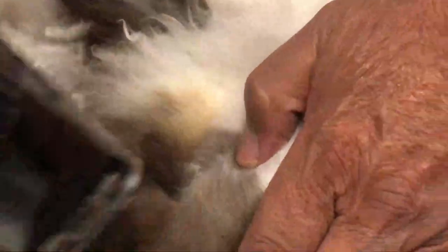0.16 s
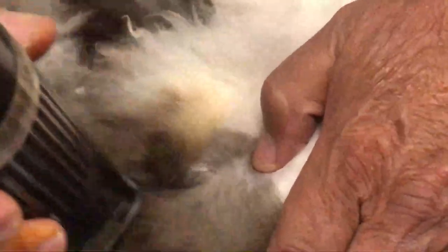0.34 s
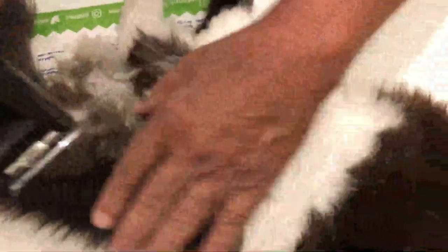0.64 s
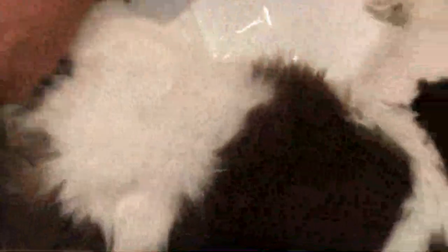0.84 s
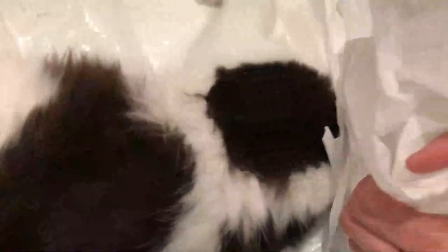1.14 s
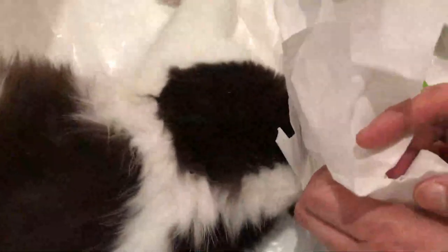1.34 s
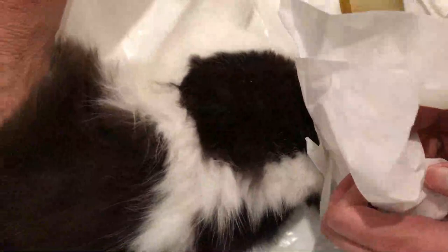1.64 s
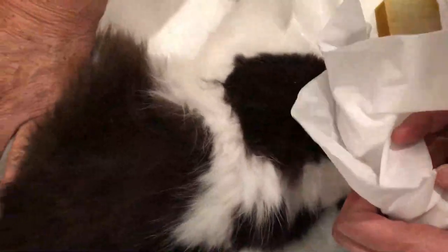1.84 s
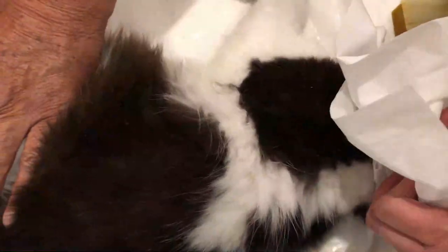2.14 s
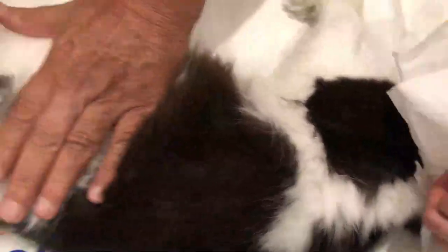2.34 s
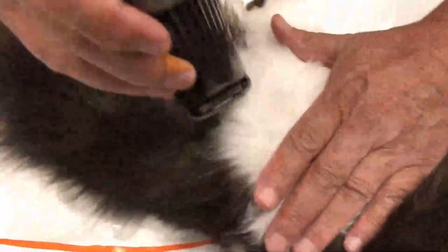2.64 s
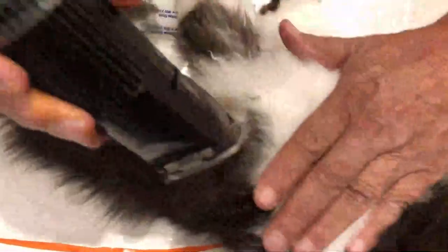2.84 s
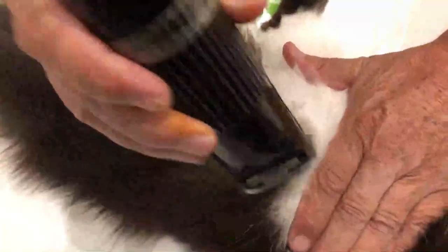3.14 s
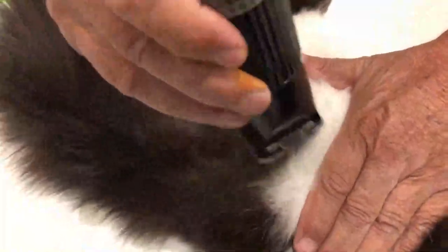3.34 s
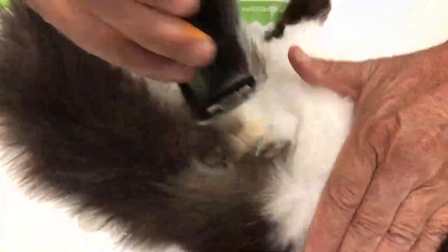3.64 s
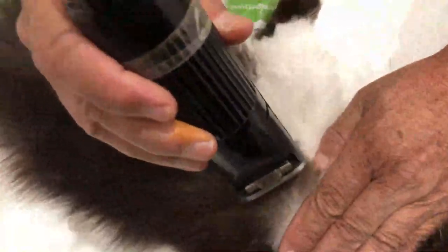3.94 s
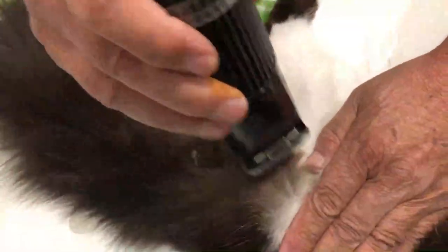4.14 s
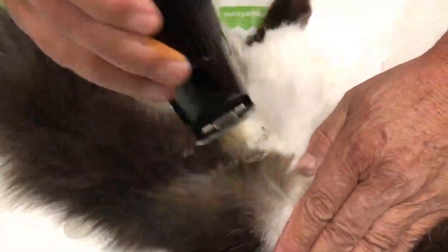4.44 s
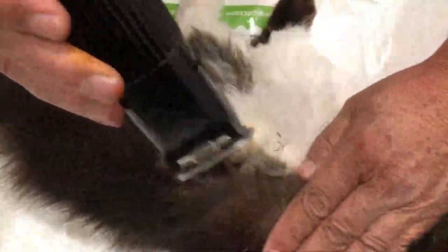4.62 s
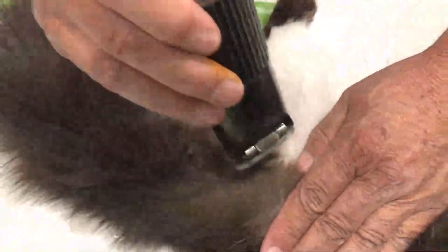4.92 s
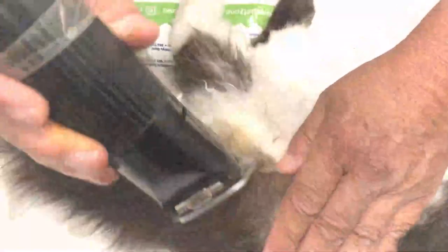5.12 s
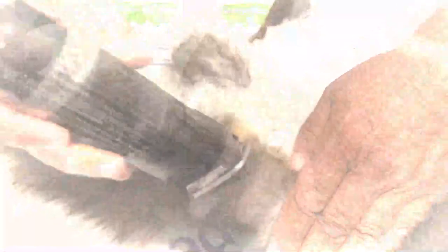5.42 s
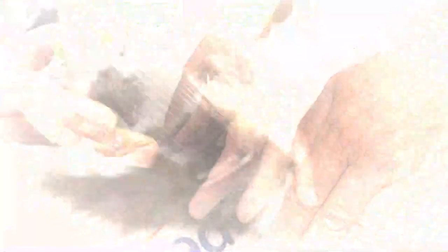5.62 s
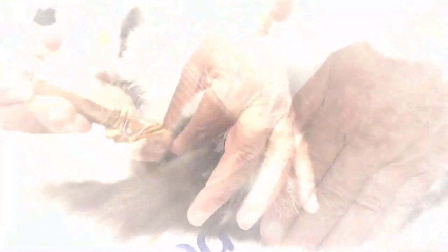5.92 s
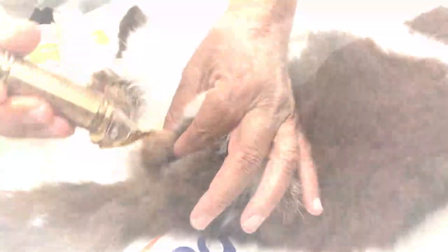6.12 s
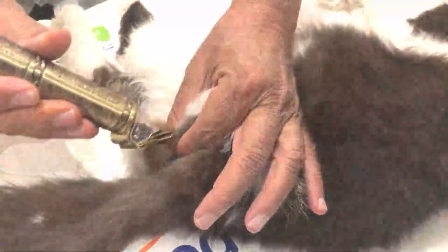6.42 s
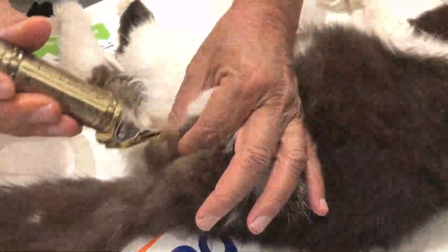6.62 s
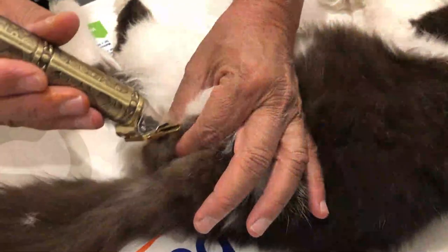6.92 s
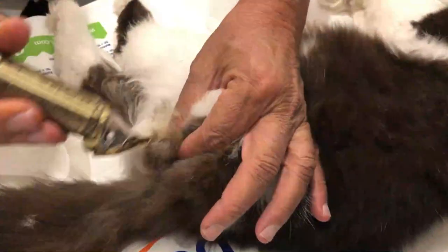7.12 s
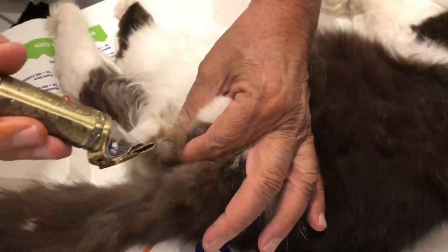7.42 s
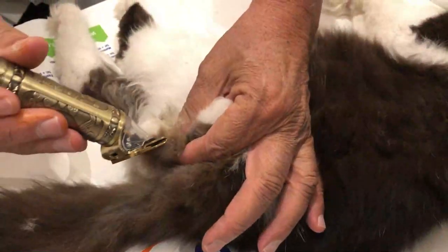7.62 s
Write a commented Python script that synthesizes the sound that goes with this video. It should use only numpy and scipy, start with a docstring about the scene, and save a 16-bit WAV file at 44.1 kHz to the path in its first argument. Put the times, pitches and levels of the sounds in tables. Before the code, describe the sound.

Close indoors, a rattling clipper motor surges and crackles on fur for nearly six seconds, followed by a smoother trimmer buzzing over low room hum.

```python
"""In a room, close to the microphone, rotary clippers shave a cat: the motor whirs on orders of its shaft,
random impacts rattle through the housing's resonances, and the steel blade rasps in surges and bites into
the fur, with spells of about nine beats a second. After a very short silence a small trimmer buzzes evenly,
a train of strokes with five knocks each built from harmonics, over the low hum of the room."""
import sys
import numpy as np
from scipy import signal
from scipy.fft import rfft, irfft
from scipy.io import wavfile
from scipy.ndimage import uniform_filter1d, map_coordinates

SR = 44100
rng = np.random.default_rng(int(sys.argv[2]) if len(sys.argv) > 2 else 0)


def unload_audio(sound):
    """Save the sound as a 16-bit wav file, at the path given as the first command line argument."""
    columns = np.transpose(np.atleast_2d(sound))
    # keep every value between -1 and 1, then stretch to whole-number steps
    steps = np.round(np.clip(columns, -1, 1) * 32767)
    wavfile.write(sys.argv[1], SR, steps.astype(np.int16))


N = 342657
T = np.arange(N) / SR  # seconds
CLIPPER_END, TRIMMER_START = 5.777, 5.825  # seconds

# How far the clippers are off the fur. Each row: time in seconds, lift (0 = blade on the fur, 1 = lifted away).
LIFT = [(0, 0.17), (.66, 0.014), (.9, 0.67), (1.4, 0.55), (2.3, 0.9), (2.62, 0.047), (5.77, 0.062)]
# Resonances of the steel blade. Each row: centre in Hz, width in Hz, boost in dB.
BLADE_RESONANCES = [(3600, 430, 1.1), (5510, 600, 6.4), (8700, 550, 7), (11990, 620, 6), (14400, 570, 2.6)]
# Knocks within one trimmer stroke. Each row: position as a share of the stroke, relative level in dB,
# centre in Hz, width in octaves, decay in seconds, share of bare click.
STROKE_KNOCKS = [(.46, 0, 4500, 1.25, .0012, .55), (.54, -4, 4200, .7, .0007, .2),
                 (.01, -1.5, 3500, .7, .001, .4), (.14, -4, 9500, .3, .0004, .5),
                 (.69, -1.5, 12500, .14, .0006, .2)]
# Swells of the trimmer's body, blade ring and treble. Each row: held level in dB, rise in dB,
# rise time in seconds.
TRIMMER_SWELLS = [(-38, 6, 0.85), (-34.5, 5, 0.83), (-35.5, 6, 0.73)]


def amp(db):
    """Decibels to gain."""
    return 10 ** (np.asarray(db) / 20)


def unit(x):
    """Scales to rms 1."""
    return x / np.sqrt(np.mean(abs(x) ** 2) + 1e-20)


def band_unit(x, band):
    """Scales so that one band (Hz, Hz) has rms 1."""
    band_pass = signal.butter(4, band, "band", fs=SR, output="sos")
    return x / np.std(signal.sosfilt(band_pass, x))


def follow(rows):
    """Draws each column of a breakpoint curve sample by sample."""
    seconds, *columns = np.transpose(rows)
    return [np.interp(T, seconds, column) for column in columns]


def drift(rate):
    """Smooth random curve of rms 1, with this many random points a second."""
    points = rng.standard_normal(N // 16)
    return unit(map_coordinates(points, [T * rate], order=2, mode="wrap"))


def shape(slope, resonances=()):
    """A dB response over frequency: a slope with bell-shaped resonances added."""
    slope_hz, slope_db = np.transpose(slope)

    def response(hz):
        base = np.interp(np.log(hz + 1), np.log(slope_hz + 1), slope_db)
        bells = sum(db * np.exp(-((hz - centre) / width) ** 2) for centre, width, db in resonances)
        return base + bells
    return response


def colour(x, response, size=4096):
    """Minimum-phase filter with a given dB response: clicks ring after they land."""
    log_gain = np.log(amp(response(abs(np.fft.fftfreq(size, 1 / SR)))))
    taps = np.fft.ifft(np.exp(np.conj(signal.hilbert(log_gain)))).real
    return signal.oaconvolve(x, taps)[:N]


def resonate(x, hz, width_hz):
    """A resonance that follows a frequency curve: two equal poles in a frame turning at that frequency."""
    turn = np.exp(2j * np.pi * np.cumsum(hz) / SR)
    r = np.exp(-np.pi * width_hz / SR)
    return (turn * signal.lfilter([(1 - r) ** 2], [1, -2 * r, r * r], x / turn)).real


def impacts(strength, per_s, spread_db):
    """Tiny impacts at random moments, of uneven size and either sign, weighted by a strength curve."""
    size = amp(spread_db * np.minimum(rng.exponential(1, N), 4)) * rng.choice([-1, 1], N)
    return unit(strength * size * (rng.random(N) < per_s / SR))


def decaying(kicks, decay_s):
    """Exponential decay after each kick."""
    return signal.lfilter([1], [1, -np.exp(-1 / (SR * decay_s))], kicks)


def swell(held_db, rise_db, rise_s):
    """Gain that climbs from the trimmer's start and then holds."""
    return amp(held_db - rise_db * np.clip(1 - (T - TRIMMER_START) / rise_s, 0, 1))


def room():
    """Low hum and rumble of an appliance: sines that waver in level and phase over filtered noise."""
    # Hum lines. Each row: frequency in Hz, relative level in dB.
    hum_lines = [(49, -48.5), (78.3, -55), (99, -55), (128.4, -39.5)]
    # Spectrum of the rumble. Each row: frequency in Hz, relative level in dB.
    rumble_slope = [(15, -32), (35, -13), (75, 2.5), (150, -3.5), (215, -2), (250, -9), (400, -18),
                    (900, -20.5), (1500, -26.5), (3000, -28), (6000, -29), (9000, -36), (16000, -42)]
    hum = 0
    for hz, db in hum_lines:
        level = amp(db + drift(5))
        hum = hum + level * np.sqrt(2) * np.sin(2 * np.pi * hz * T + 0.24 * drift(4.5))
    rumble = amp(-39.0) * unit(colour(rng.standard_normal(N), shape(rumble_slope)))
    return swell(held_db=-37.5, rise_db=4.5, rise_s=0.65) * unit(hum + rumble)


def handling():
    """Hands on the table: softly swelling low noise and dull bumps, sines with a bell-shaped level."""
    # Spectrum of the low noise under the clippers. Each row: frequency in Hz, relative level in dB.
    floor_slope = [(15, -26), (45, -5), (80, -3), (120, 5), (170, -2), (260, -6), (600, -21), (16000, -40)]
    # Soft bumps. Each row: middle in seconds, half-length in seconds, pitch in Hz, relative peak in dB.
    soft_bumps = [(.02, .025, 115, -40), (.13, .02, 130, -44), (1.075, .02, 120, -41),
                  (1.11, .02, 170, -41), (1.77, .012, 80, -37), (1.785, .012, 165, -37),
                  (2.07, .02, 115, -44), (2.45, .035, 112, -43), (3.25, .015, 130, -41),
                  (3.96, .02, 125, -41), (4.25, .02, 115, -43), (4.36, .02, 115, -43),
                  (4.94, .02, 105, -45)]
    floor = amp(-49.5 + 1.4 * drift(6.1)) * unit(colour(rng.standard_normal(N), shape(floor_slope)))
    phase = .7 * drift(90)  # roughens the bumps
    thuds = 0
    for s, length, hz, db in soft_bumps:
        envelope = np.exp(-((T - s) / length) ** 2)
        thuds = thuds + amp(db) * envelope * np.sin(2 * np.pi * hz * (T - s) + phase)
    return floor + amp(1.5) * thuds


def teeth_hiss(turns):
    """A faint fizz of the sliding teeth: filtered impacts, strongest after the stroke's first listed knock."""
    sliding = .5 + np.exp(-((turns - STROKE_KNOCKS[0][0]) % 1) / 0.16)
    response = shape([(500, -12), (2950, -14), (3500, 8), (4300, -7), (4750, -7), (5200, 2), (5650, -6),
                      (6250, 1), (6650, -9), (7300, -4), (8600, -16), (10500, -16), (12500, -6), (15000, -5)])
    fizz = unit(colour(impacts(sliding, per_s=6000, spread_db=3), response))
    return amp(-15.) * swell(*TRIMMER_SWELLS[2]) * fizz


def wandering(z, hz):
    """Smooths random values over the hand's path: short waves change sooner than long ones."""
    wander_cycles = 2600  # sets how long a partial keeps its strength
    per_s = np.fft.fftfreq(len(z), (T[-1] - TRIMMER_START) / len(z))[:, None]
    smoothing = np.exp(-(per_s * wander_cycles / hz) ** 2 / 2)
    z = np.fft.ifft(np.fft.fft(z, axis=0) * smoothing, axis=0)
    return z / np.sqrt(np.mean(abs(z) ** 2, 0))


def stroke_partials(hz, count=205, size=512):
    """Partials of successive strokes: each knock is a click, a short ring and an echo, landing unevenly."""
    spread_db, slip_s = .6, .000007  # rms spread of the knocks' force and timing
    hand_change, echo = .8, .115     # how far the moving hand changes the ring; constant tail of the ring
    k = np.arange(1, len(hz) + 1)
    change = hand_change * np.minimum(hz / 7000, 1.2) ** 1.5  # short waves feel the moving hand most
    grit = .16 * np.minimum(hz / 4000, 1) ** 2                # fresh noise in each ring
    out = 0
    for at, db, centre_hz, octaves, decay_s, click_share in STROKE_KNOCKS:
        age = (np.arange(size) / size - at) % 1 / hz[0]  # seconds since the knock
        noise = rng.standard_normal((count + 1, size)) * (np.exp(-age / decay_s) + echo)
        rings = unit(rfft(noise)[:, k])
        ring = (rings[0] + change * wandering(rings[1:], hz)) / np.sqrt(1 + change ** 2)
        ring = ring + grit * rings[:0:-1]
        click = np.exp(-2j * np.pi * k * at)
        force, delay = unit(uniform_filter1d(rng.standard_normal((2, count, 1)), size=7, axis=1))
        landing = amp(db + spread_db * force) * np.exp(-2j * np.pi * hz * slip_s * delay)
        band = np.exp(-(np.log2(hz / centre_hz) / octaves) ** 2 / 2)
        out = out + landing * band * (ring + click_share * click)
    return out / np.sqrt(np.mean(abs(out) ** 2, 0))


def trimmer(count=150):
    """An even train of strokes: a wavetable of partials whose colour drifts as the hand moves."""
    # Pace of the trimmer. Each row: time in seconds, strokes per second.
    stroke_rate = [(5.84, 105.7), (6.217, 105.9), (6.428, 105.4), (6.668, 105.8), (6.908, 105.4),
                   (7.134, 105.7), (7.76, 105.5)]
    # Low partials. Each row: multiple of the stroke rate, relative level in dB.
    low_partials = [(1, -24), (2, 1), (3, -31), (4, -35), (5, -6.5), (6, -9.5), (7, 4), (8, -3), (9, 10.5),
                    (10, -3.5), (11, 11.5), (12, -28), (13, -4.5), (14, 0.5), (15, -2.5), (16, -4),
                    (17, -3), (18, -3.5), (19, 4.5), (20, 0.5), (21, -18), (22, -1), (23, 8.5), (24, 5),
                    (25, 5), (26, -3.5), (27, -30), (28, -21.5), (29, -14), (30, -4.5), (31, -22), (32, -1),
                    (33, -6.5), (34, -1), (35, -3), (36, -9), (37, -6), (38, -16), (39, -10.5), (40, -17)]
    # Outline of the high partials. Each row: frequency in Hz, relative level in dB.
    sheen = [(4330, -13), (4435, -22), (4540, -8), (4650, -13), (5070, -11), (5280, -7.5), (5490, -12),
             (5650, -21), (5915, -9), (6130, -13), (6440, -8.5), (6560, -18), (6980, -19), (7180, -12),
             (7500, -17), (8500, -20), (9500, -26), (11000, -26), (11500, -21), (12300, -18), (12700, -24),
             (13200, -21), (14300, -25), (15500, -21)]
    # The blade ring sinks and grows as it is pressed into the fur. Each row: time in seconds, centre in Hz,
    # boost in dB.
    pressed_ring = [(5.83, 3500, 0), (6.07, 3400, .5), (6.19, 3400, 7), (6.3, 3570, 4), (6.55, 3600, 4),
                    (7.05, 3550, 3), (7.2, 3370, 8), (7.33, 3520, 7), (7.5, 3450, 5), (7.76, 3480, 4.5)]
    hz = np.arange(1, count + 1) * np.mean(np.array(stroke_rate)[:, 1])
    partial_db = shape(sheen)(hz)
    for multiple, db in low_partials:
        partial_db[round(multiple) - 1] = db
    stroke = stroke_partials(hz)
    moments = np.linspace(TRIMMER_START, T[-1], len(stroke))[:, None]
    ring_hz, ring_db = (np.interp(moments, T, curve) for curve in follow(pressed_ring))
    ring = amp(ring_db * np.exp(-((hz - ring_hz) / 220) ** 2))
    partials = amp(partial_db) * stroke * ring / np.sqrt(np.mean(ring ** 2, 0))

    on = T >= TRIMMER_START
    turns = np.cumsum(follow(stroke_rate)[0]) / SR + 0.00025 * drift(90)  # slight jitter
    position = np.linspace(0, len(partials) - 1, on.sum())
    part = np.searchsorted([2900, 4300], hz)  # body, blade ring, treble (edges in Hz)
    out = np.zeros(N)
    for i, band in enumerate(TRIMMER_SWELLS):
        cycles = irfft(np.pad(partials * (part == i), ((0, 0), (1, 0))), 4096)  # one waveform a row
        place = [position, turns[on] % 1 * cycles.shape[1]]
        wave = map_coordinates(cycles, place, order=1, mode="grid-wrap")
        out[on] += swell(*band)[on] * unit(wave)
    return out + teeth_hiss(turns)


def driven(level_db, by_effort, by_surge, lifted_db):
    """Gain of one part of the clippers: it follows the effort, the surges and the lift off the fur."""
    # How loud the clippers run as the hand moves them about. Each row: time in seconds, change in dB
    # (each part scales it).
    effort = [(0, -2.5), (.85, -2), (1.45, -6), (1.75, -3), (2.3, -3), (2.85, 0), (4, 0), (4.7, 0.5),
              (5.3, -1.16), (5.77, -7)]
    # Surges in which the steel rubs harder. Each row: middle in seconds, half-length in seconds,
    # rise in dB (each part scales it).
    surges = [(.27, 0.13, 2), (0.553, 0.057, 3.5), (0.73, 0.12, 5), (.87, 0.097, 0.5), (2.859, 0.17, 2.5),
              (3.809, 0.25, 5), (4.656, 0.19, 1), (5.162, 0.22, 5), (5.626, 0.37, 4.5)]
    surge_db = 0
    for s, length, db in surges:
        surge_db = surge_db + db * np.cos(np.pi / 2 * np.clip((T - s) / length, -1, 1)) ** 4
    lift_db = lifted_db * follow(LIFT)[0]
    return amp(level_db + by_effort * follow(effort)[0] + by_surge * surge_db + lift_db)


def motor(turns):
    """Wavering orders of the shaft: the first wobbles in the hand, the second sings as fur loads the blade."""
    # Level of the first order. Each row: time in seconds, rms level in dB.
    shaft_hum = [(0, -63), (.15, -62), (.27, -49), (.37, -60), (.55, -51), (.74, -49), (.88, -56),
                 (1.25, -61), (1.42, -49), (1.65, -57.5), (1.86, -48), (2.1, -54.5), (2.2, -49.5),
                 (3.2, -52), (3.8, -44.5), (4.1, -50.5), (5.2, -46), (5.4, -56.5), (5.77, -52)]
    # Higher orders. Each row: multiple of the shaft speed, rms level on the fur in dB, dB more when lifted.
    higher_orders = [(3, -55, 0), (4, -59, 0), (9, -55.5, 6)]
    second = driven(level_db=-41.0, by_effort=1.5, by_surge=0.29, lifted_db=-19.0)
    orders = [(2, second)]
    for multiple, db, lifted_db in higher_orders:
        orders.append((multiple, amp(db + lifted_db * follow(LIFT)[0])))
    hum_level = amp(follow(shaft_hum)[0] + 1.2 * drift(22))
    hum = hum_level * np.sin(2 * np.pi * turns + .45 * drift(25))
    whine = 0
    for multiple, gain in orders:
        whine = whine + gain * amp(1.1 * drift(14)) * np.sin(2 * np.pi * (multiple * turns + rng.random()))
    return np.sqrt(2) * (hum + whine)


def chatter(turns, gear, scatter, decay_s, steady):
    """Strength of the blade's knocks: a blow at each uneven reversal that dies away, limited by its play."""
    reversals = np.diff(np.floor(turns / gear + scatter * drift(45)), prepend=0) > 0
    blows = decaying(reversals * rng.rayleigh(1, N), decay_s)
    return steady + 2 * np.tanh(blows / 2)


def rattle(knocking, lift):
    """The knocks sound through the housing, whose resonances change when it leaves the fur."""
    # Overall slope of the housing. Each row: frequency in Hz, response in dB.
    housing_slope = [(60, -12.5), (250, -11), (480, -7), (650, 0), (1150, 0.5), (2400, 1), (4500, -1.5),
                     (8000, -8.5), (10000, -11), (16000, -22.5)]
    # Housing resonances. Each row: centre in Hz, width in Hz, boost on the fur in dB, boost lifted in dB.
    housing = [(692, 34, 4, -11), (823, 133, 3, 8.5), (934, 55, 5.5, 1.5), (1343, 39, 5, -3),
               (1630, 100, 2.5, -1), (1800, 274, 3.5, 4.5), (2370, 130, -4.5, 2), (3073, 49, 6, -9),
               (3700, 340, 0, -2), (4500, 160, 2, -20), (5180, 230, 3, 7.5), (6940, 860, 4, 2),
               (8660, 250, -4, -11)]
    # The strongest resonance shifts with the grip. Each row: time in seconds, centre in Hz.
    grip = [(0, 1480), (.6, 1460), (.87, 1550), (1.1, 1594), (2.7, 1510), (3, 1550), (3.5, 1460),
            (4.7, 1495), (5.2, 1500), (5.77, 1530)]
    hits = impacts(knocking + 0.45, per_s=14000, spread_db=1.85)
    fur_resonances = [(hz, width, fur_db) for hz, width, fur_db, _ in housing]
    lifted_resonances = [(hz, width, lifted_db) for hz, width, _, lifted_db in housing]
    on_fur = colour(hits, shape(housing_slope, fur_resonances))
    lifted = colour(hits, shape(housing_slope, lifted_resonances))
    body = band_unit((1 - lift) * on_fur + lift * lifted, (600, 2400))
    honk_hits = impacts(knocking + 0.43, per_s=14000, spread_db=3.5)
    honk = unit(resonate(honk_hits, follow(grip)[0], width_hz=250))
    body_gain = driven(level_db=-32.5, by_effort=0.84, by_surge=0.19, lifted_db=0.2)
    honk_gain = driven(level_db=-36.5, by_effort=1.2, by_surge=.05, lifted_db=-7.0)
    return body_gain * body + honk_gain * honk


def slackening(ease_s, snap_s):
    """Beat after beat the blades ease apart and snap back into contact: dB of the rasp and of the ring."""
    # Spells of beating. Each row: first snap in seconds, last snap in seconds, drop of the rasp in dB,
    # drop of the ring in dB.
    spells = [(.125, .125, -6, -1), (.21, .21, -7, -14), (.385, .495, -8, -4), (.675, .675, -6, -3),
              (1.782, 2.33, -8, -1.5), (2.505, 2.83, -8, -3.5), (3.085, 3.085, -3, -3),
              (3.19, 3.615, -9, -4), (4.086, 4.497, -8, -5), (4.864, 5.064, -4, -3),
              (5.38, 5.715, -5.5, -2.5)]
    beat_s, slack_s = .108, 0.063  # approximate time from snap to snap; slack time before each snap
    db = np.zeros((2, N))
    for first, last, *drops in spells:
        for snap in np.linspace(first, last, round((last - first) / beat_s) + 1):
            slack = np.clip((T - snap + slack_s) / ease_s, 0, 1) * (T < snap)
            db += np.outer(drops, slack)
    pole = np.exp(-1 / (SR * snap_s))
    return signal.lfilter([1 - pole], [1, -pole], db)


def blade(knocking, lift):
    """Steel rubs on steel; its main ring sits higher when the fur does not load it."""
    # Overall slope of the steel. Each row: frequency in Hz, response in dB.
    blade_slope = [(200, -32), (700, -5.5), (2000, 1), (4500, -2), (7000, -0.5), (10300, -1), (13000, 0),
                   (16000, 2)]
    # Level of the main ring before the beats. Each row: time in seconds, rms level in dB.
    ring_level = [(0, -38), (.65, -43), (.75, -36.5), (1, -37.5), (1.45, -43), (1.8, -37), (2.95, -41),
                  (3.3, -40), (3.7, -37), (3.9, -30.5), (4.15, -37.5), (4.6, -36.5), (5.25, -37),
                  (5.77, -53)]
    rasp_db, ring_db = slackening(ease_s=0.03, snap_s=0.00058)
    rubbing = impacts(knocking + .5, per_s=9000, spread_db=0.0)
    steel = band_unit(colour(rubbing, shape(blade_slope, BLADE_RESONANCES)), (10000, 15800))
    ring_hits = impacts(knocking, per_s=12000, spread_db=1.5)
    ring = unit(resonate(ring_hits, 3470 + 230 * lift + 70 * drift(7), width_hz=640))
    rasp_gain = driven(level_db=-33.5, by_effort=1.6, by_surge=1.0, lifted_db=-1.5)
    return rasp_gain * amp(rasp_db) * steel + amp(follow(ring_level)[0] + ring_db) * ring


def singing(knocking, sharpness):
    """The knocks briefly excite one narrow resonance of housing or steel, which swells and fades."""
    # Sung notes. Each row: middle in seconds, half-length in seconds, pitch in Hz,
    # level in dB (rms before the swell).
    notes = [(.28, .2, 2250, -42), (.28, .15, 3250, -41), (.55, .15, 1950, -41), (.76, .1, 2060, -42),
             (.8, .15, 5500, -42), (.85, .2, 2400, -43), (.87, .15, 1620, -37), (.92, .12, 708, -48),
             (1.22, .15, 1535, -42), (1.55, .2, 1620, -45), (2.0, .35, 3720, -42), (2.05, .35, 8700, -46),
             (2.38, .12, 1470, -39), (2.95, .2, 1530, -37), (3.85, .12, 1960, -39), (4.7, .12, 1505, -34),
             (5.24, .14, 1880, -35), (5.24, .12, 14350, -35)]
    out = np.zeros(N)
    for s, length, hz, db in notes:
        near = abs(T - s) < length
        noise = knocking[near] * rng.standard_normal(near.sum())
        ring = resonate(noise, np.full(near.sum(), hz), hz / sharpness)
        out[near] += amp(db) * unit(ring) * np.cos(np.pi / 2 * (T[near] - s) / length) ** 2
    return out


def choked(x):
    """Fur packed against the blade damps the band in which it rings."""
    # Spells of thick fur. Each row: start in seconds, end in seconds, change of the ringing band in dB.
    thick_fur = [(.14, .212, -4), (.36, .495, -3), (.63, .674, -3), (2.69, 2.727, -3), (3.47, 3.51, -4),
                 (3.883, 3.891, -6)]
    db = sum(change * ((T > start) & (T < end)) for start, end, change in thick_fur)
    band_pass = signal.butter(2, (2200, 4900), "band", fs=SR, output="sos")
    ringing = signal.sosfiltfilt(band_pass, x)
    return x + (amp(uniform_filter1d(db * 1., size=300)) - 1) * ringing


def bites(knocking, rise_s, gain_db):
    """The teeth bite into a tuft: a quick burst of snapping hairs, as impacts, that rings the blade."""
    # Bites. Each row: start in seconds, relative level in dB.
    tufts = np.array([(.215, -33), (.30, -33), (.505, -33), (2.63, -31), (2.73, -28), (2.86, -32),
                      (3.085, -25.5), (3.205, -31), (3.305, -25), (3.41, -28), (3.51, -29), (3.615, -29.5),
                      (3.845, -28), (4.085, -27), (4.19, -27.5), (4.305, -29), (4.41, -31), (5.065, -29)])
    age = np.maximum(T - tufts[:, :1], 0) / rise_s
    strength = amp(tufts[:, 1]) @ (age * np.exp(1 - age))
    response = shape([(500, -19), (2850, -21), (3080, -2.0), (3550, -2.5), (3800, -6), (4200, -25),
                      (15000, -13.5)])
    snapping = impacts(knocking, per_s=9000, spread_db=1.0)
    return amp(gain_db) * strength * unit(colour(snapping, response))


def bursts(rows, decay_s):
    """Noise that jumps up and dies away at each event."""
    kicks = np.zeros(N)
    for s, db in rows:
        kicks[round(s * SR)] = amp(db)
    return decaying(kicks, decay_s) * rng.standard_normal(N)


def clacks(decay_s, gain_db):
    """The blade snags and strikes its guide: a crack and a short ring, both decaying noise."""
    # Hard clacks. Each row: start in seconds, relative level in dB.
    strikes = [(.055, -17), (.103, -18), (0.1311, -8.5), (.151, -18), (0.1735, -11), (.191, -18),
               (0.2563, -14.5), (0.386, -14), (.405, -19), (0.4374, -14), (.447, -18), (0.462, -14),
               (0.5082, -14), (0.5327, -10), (.612, -16), (.647, -17), (0.6774, -9), (0.6948, -10.5),
               (0.8415, -14), (0.8674, -12), (0.9268, -14), (1.0525, -20), (1.5808, -17), (1.729, -16),
               (1.8886, -19), (2.0103, -17), (2.0328, -17), (2.387, -15), (2.5042, -18), (2.5177, -15),
               (2.5601, -15), (2.6284, -15), (2.7292, -15), (2.829, -16), (2.8519, -12), (2.9781, -10),
               (3.1517, -15), (3.257, -16), (3.3223, -8), (3.3737, -13), (3.3922, -16), (3.4126, -15),
               (3.46, -15), (3.5857, -16), (3.6177, -13), (3.8921, -9), (4.0622, -17), (4.0861, -11),
               (4.1944, -12), (4.283, -16), (4.3091, -13), (4.356, -13), (4.4019, -14), (4.4448, -11),
               (4.474, -13), (4.4957, -12), (4.558, -14), (4.5984, -12), (4.792, -12), (4.8683, -8),
               (5.0624, -15), (5.1312, -12), (5.382, -13), (5.4979, -17)]
    slope = [(200, -17.0), (800, -0.5), (1600, 3.5), (3000, -4.5), (7000, -4), (15000, -5.0)]
    crack = bursts(strikes, decay_s=.0004)
    ring = bursts(strikes, decay_s)
    return colour(amp(gain_db) * ring + 0.51 * crack, shape(slope, BLADE_RESONANCES[:3]))


def clipper():
    """The motor drives the blade, which knocks in the housing, rasps, bites and now and then clacks."""
    # Speed of the motor before its flutter. Each row: time in seconds, turns per second.
    motor_speed = [(0, 332), (.45, 335), (.7, 339), (1.3, 337), (2.2, 341), (3, 340), (3.3, 342),
                   (4.3, 340), (5.3, 342), (5.77, 340)]
    lift = np.clip(follow(LIFT)[0], 0, 1)
    flutter = (1 - .7 * lift) * (.0035 * drift(35) + .0035 * drift(8))  # steadier when lifted
    turns = np.cumsum(follow(motor_speed)[0] * (1 + flutter)) / SR
    knocking = chatter(turns, gear=4.7, scatter=.4, decay_s=0.0034, steady=1.0 - 0.21 * lift)
    running = rattle(knocking, lift) + blade(knocking, lift) + singing(knocking, sharpness=17)
    biting = bites(knocking, rise_s=0.018, gain_db=-3.5)
    return motor(turns) + choked(running) + biting + clacks(decay_s=0.0025, gain_db=-7.0)


def scene():
    """Clippers with handling, then the trimmer with the room, the same in both ears."""
    first = (clipper() + handling()) * (T < CLIPPER_END)
    second = (trimmer() + room()) * (T >= TRIMMER_START)
    mono = first + second
    return np.array([mono, mono])


def record(dry):
    """Band limit: a steep linear-phase low-pass takes away the top of the treble."""
    edge_hz = 15850
    low_pass = signal.firwin(801, edge_hz, window=("kaiser", 9), fs=SR)
    return signal.oaconvolve(dry, low_pass[None], "same")


dry = scene()
out = record(dry)
unload_audio(out)
```